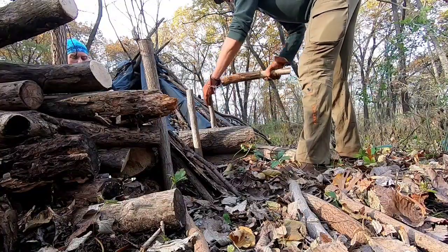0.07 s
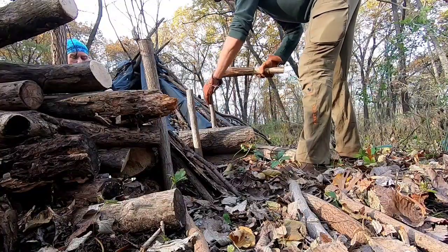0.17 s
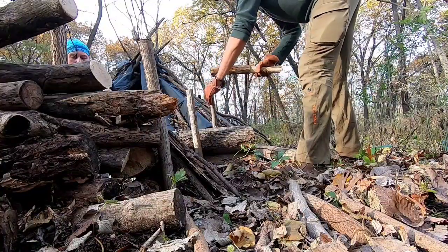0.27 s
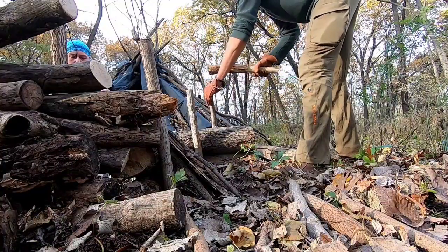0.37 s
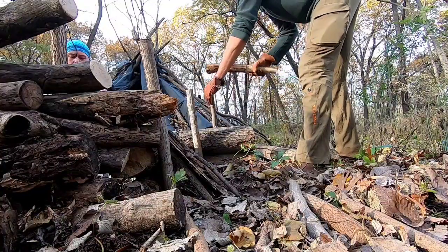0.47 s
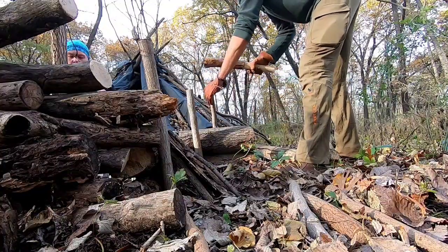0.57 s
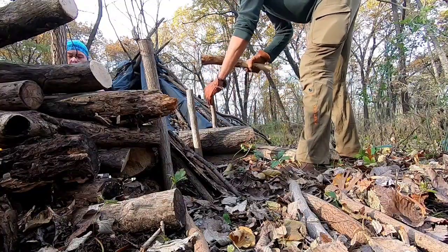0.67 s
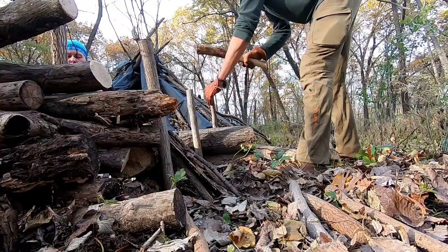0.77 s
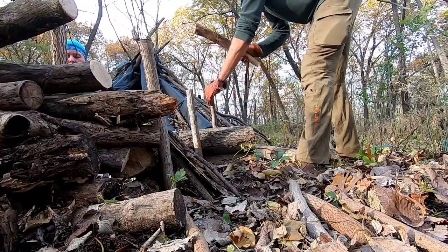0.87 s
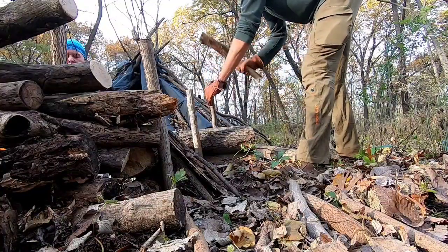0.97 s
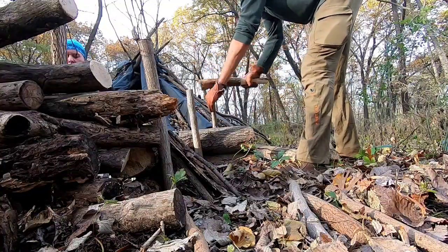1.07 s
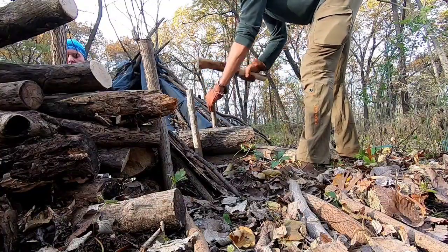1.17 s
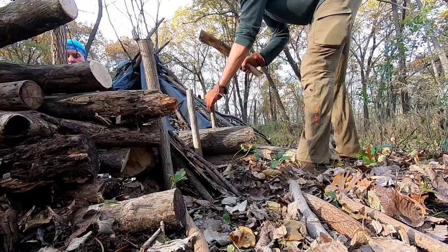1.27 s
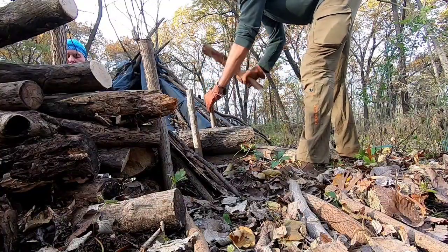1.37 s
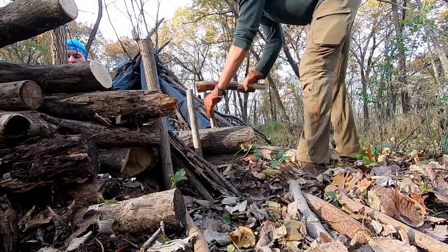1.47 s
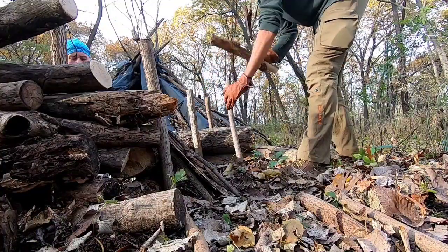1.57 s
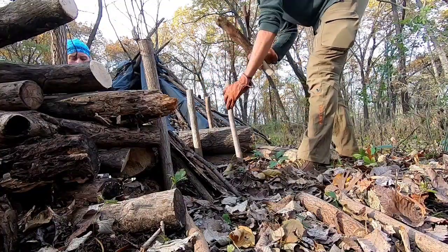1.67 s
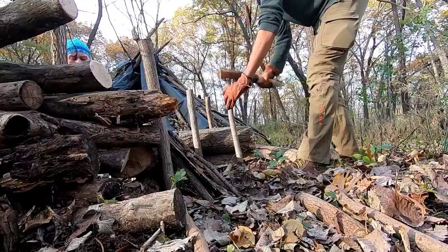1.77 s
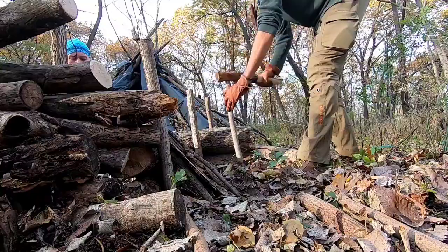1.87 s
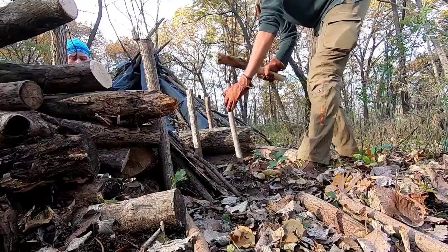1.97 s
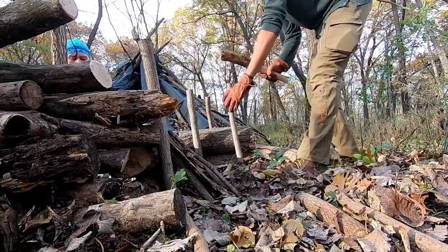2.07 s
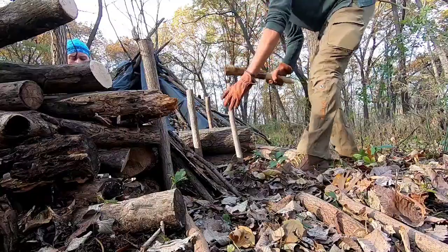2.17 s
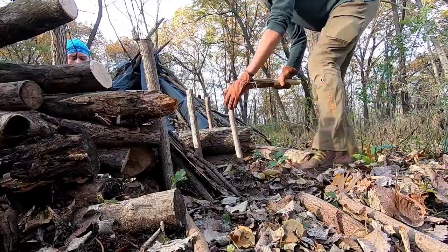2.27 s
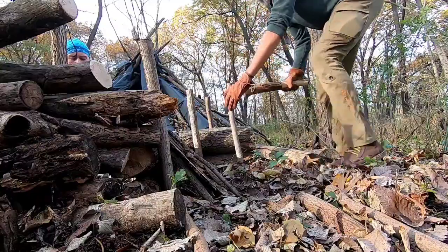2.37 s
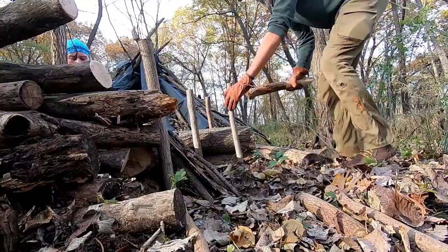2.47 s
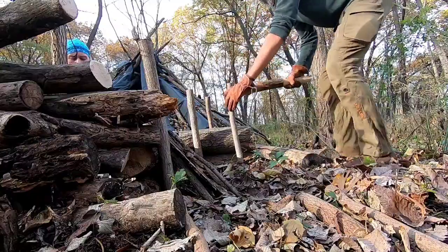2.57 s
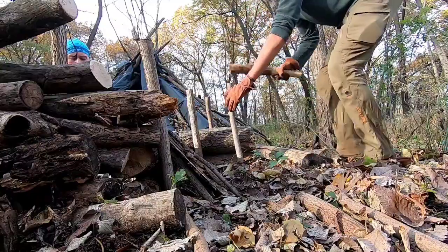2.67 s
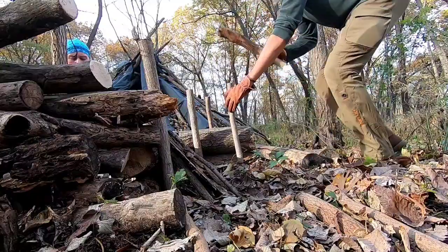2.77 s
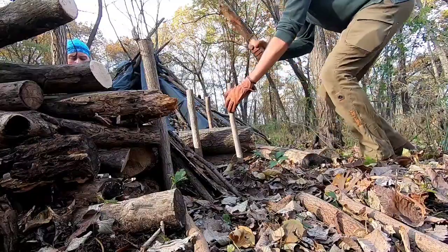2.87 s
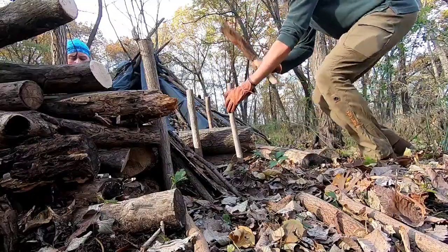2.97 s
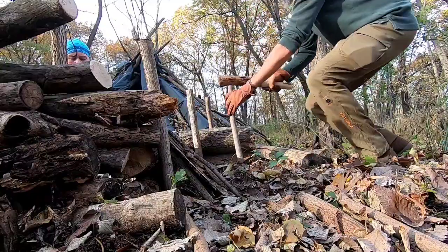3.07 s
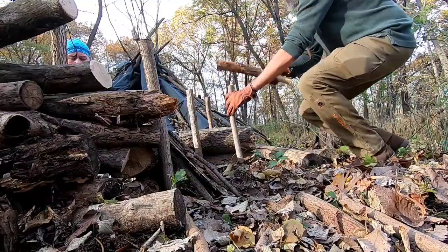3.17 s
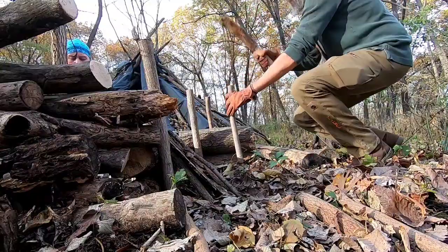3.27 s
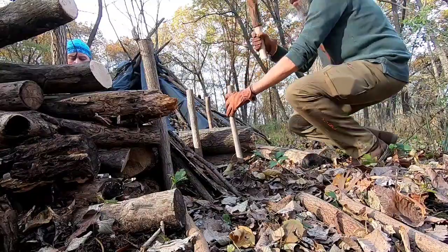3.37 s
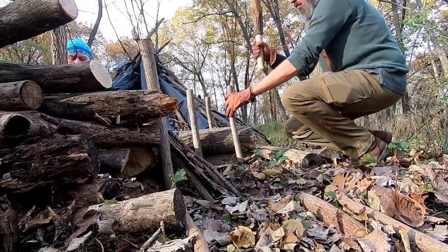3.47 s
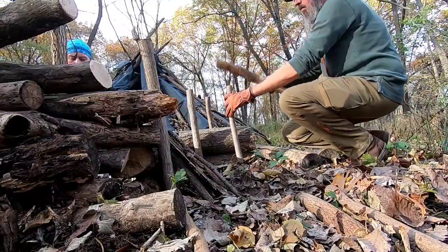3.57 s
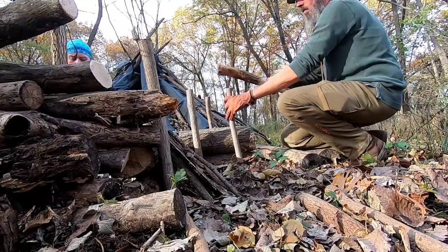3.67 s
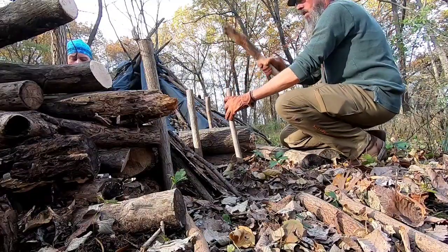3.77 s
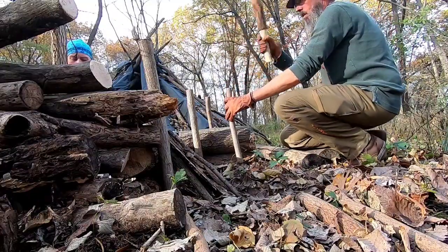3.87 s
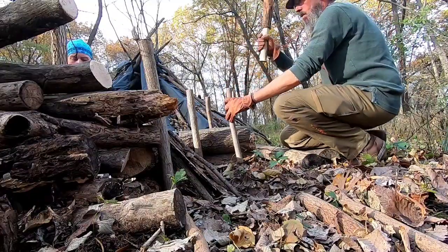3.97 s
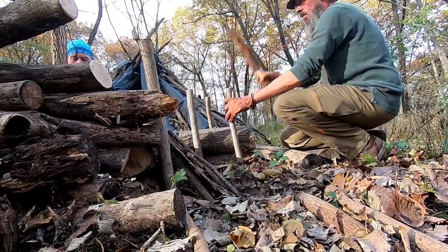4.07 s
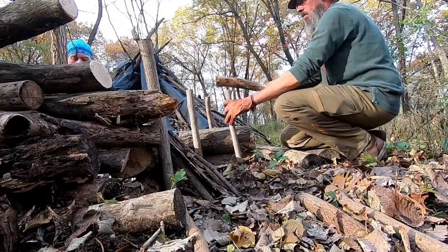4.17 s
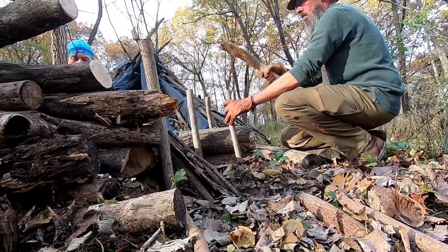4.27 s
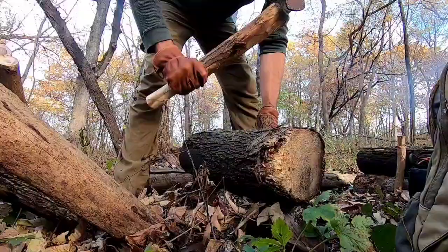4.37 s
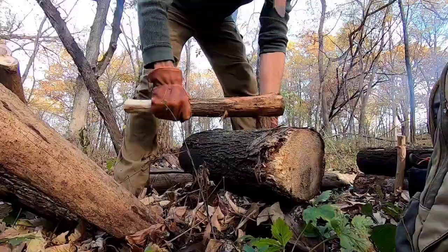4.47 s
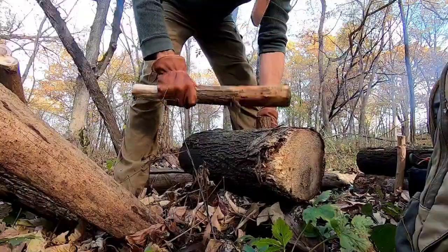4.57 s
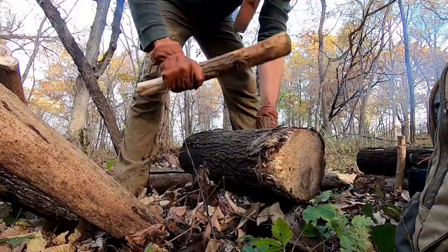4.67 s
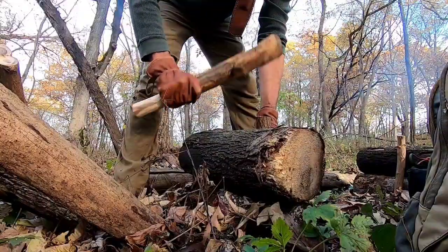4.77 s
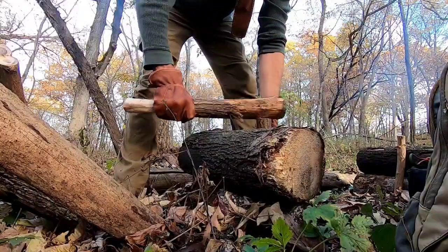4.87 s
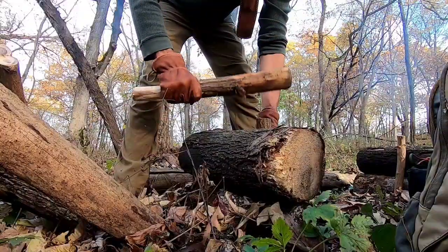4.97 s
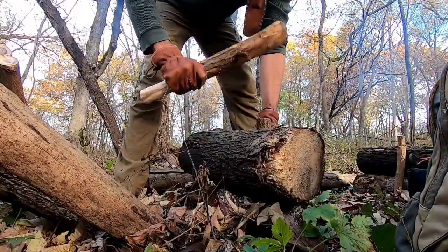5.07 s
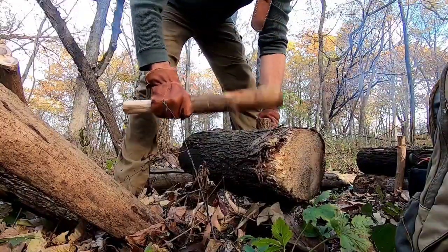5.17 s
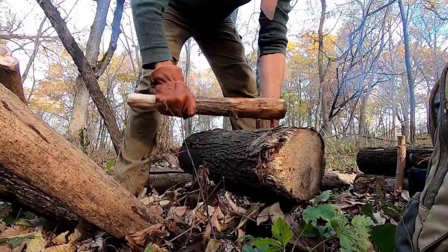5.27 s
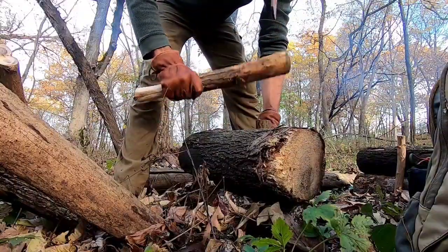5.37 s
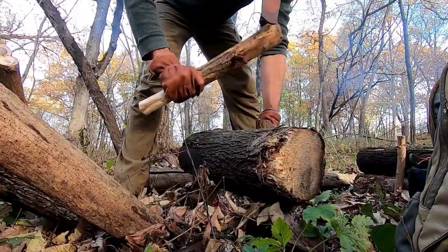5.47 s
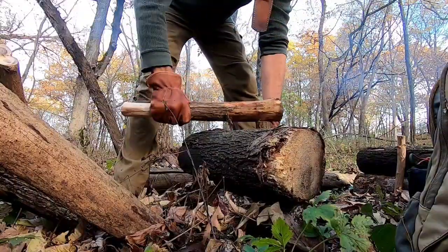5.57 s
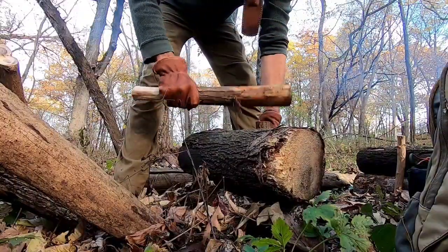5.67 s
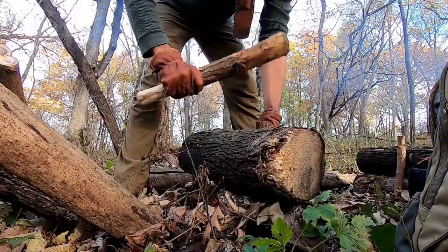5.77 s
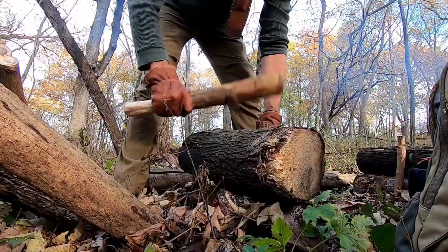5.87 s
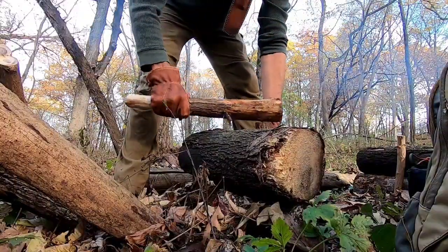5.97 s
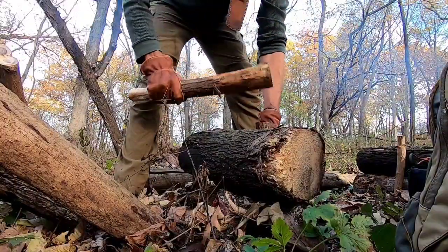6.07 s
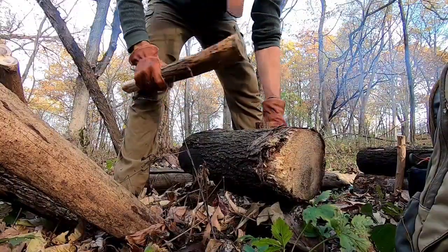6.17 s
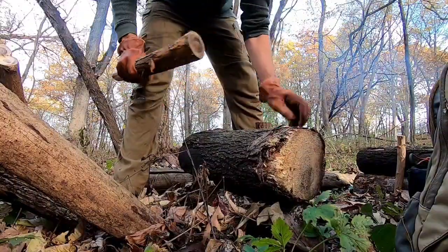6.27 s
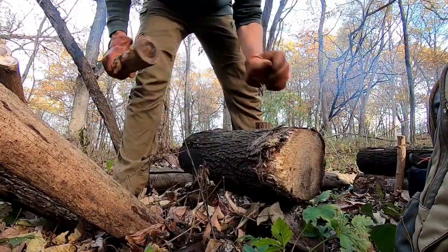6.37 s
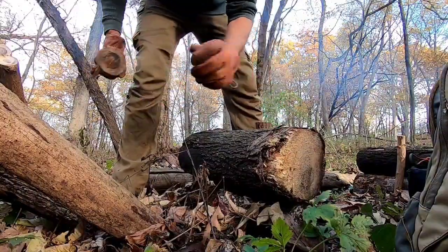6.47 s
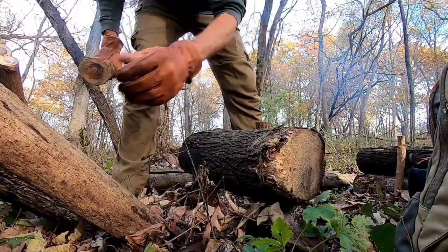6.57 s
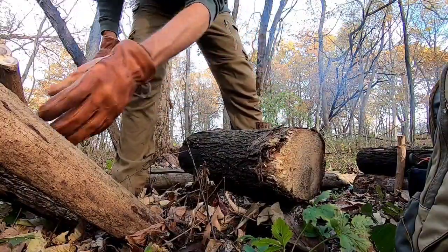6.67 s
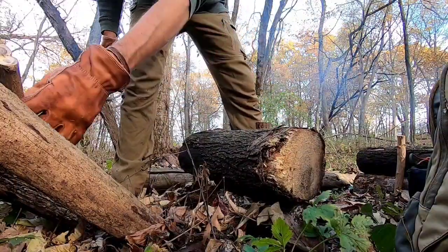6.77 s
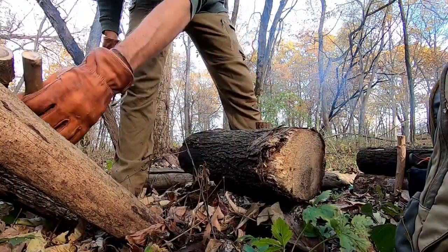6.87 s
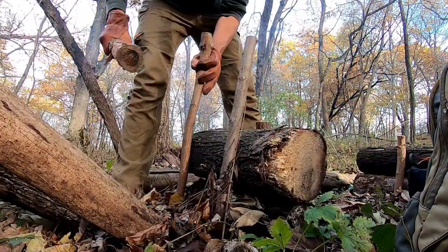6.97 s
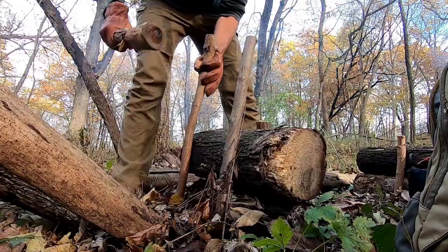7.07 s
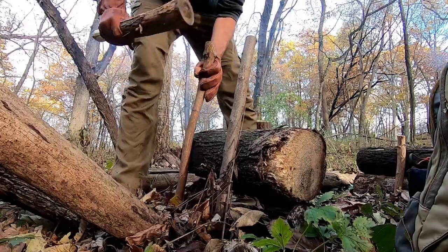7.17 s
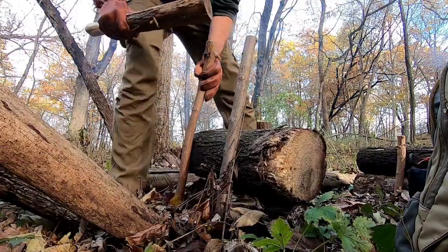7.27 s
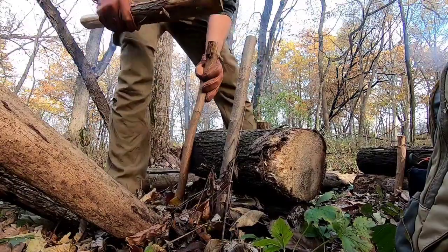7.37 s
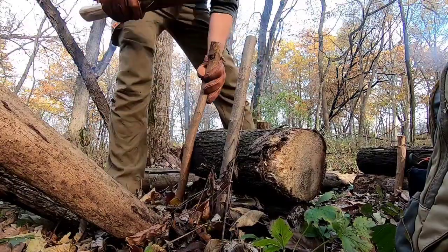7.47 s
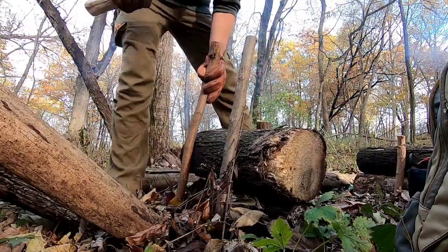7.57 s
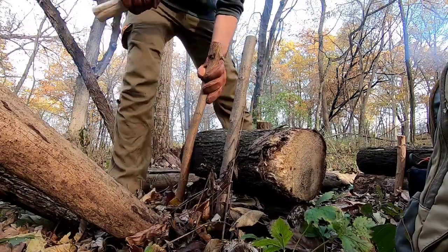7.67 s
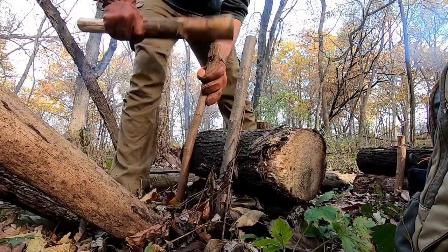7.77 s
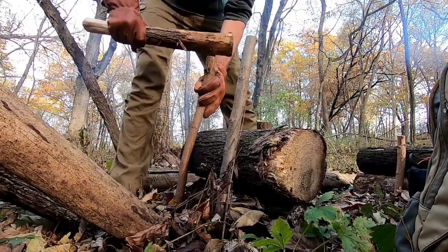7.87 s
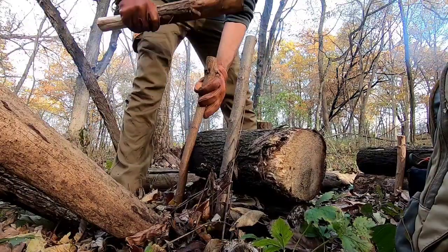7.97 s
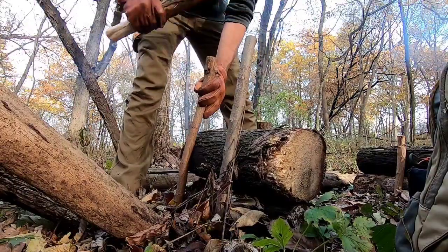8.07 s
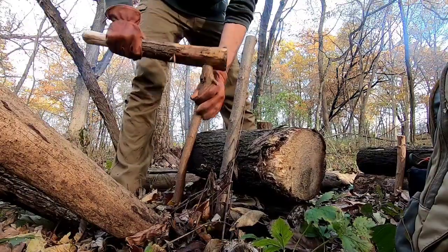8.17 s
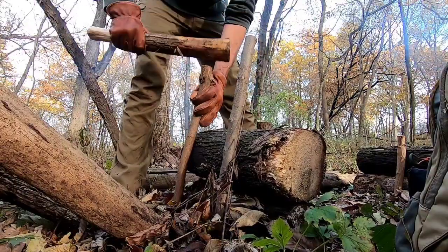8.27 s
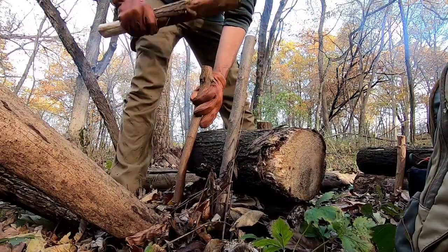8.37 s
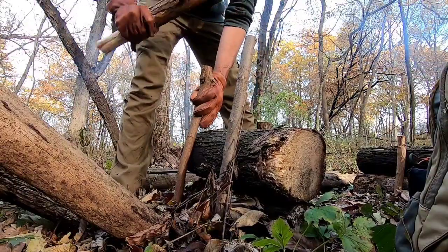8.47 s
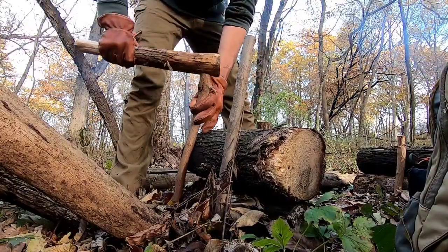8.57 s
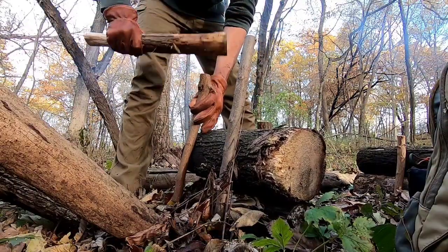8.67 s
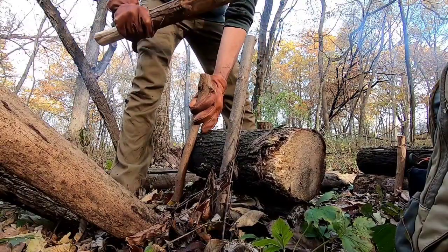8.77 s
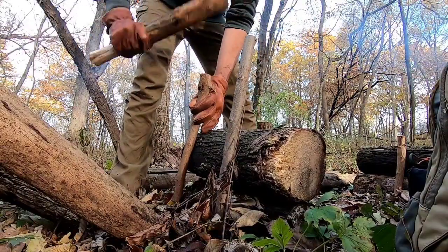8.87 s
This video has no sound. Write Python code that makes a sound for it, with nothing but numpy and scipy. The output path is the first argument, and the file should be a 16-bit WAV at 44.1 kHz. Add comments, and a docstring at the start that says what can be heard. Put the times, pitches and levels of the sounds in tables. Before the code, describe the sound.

Outdoors in woods, close to a small microphone, a wooden club hits stakes. Three spaced sharp knocks come first, then boots scuff crackling leaves and twigs snap before three more. The place changes and five steady, thuddier blows follow. After another change come leaf rustles, snaps and light wood taps, then three final knocks. Faint trunk echoes, hiss and low wind rumble surround them.

```python
"""Forest floor: a wooden club drives stakes into the soil a step from a small microphone, at three spots in turn.
Each blow excites damped modes of club and stake, a thud and ground shake in the soil, and a late echo from trunks.
Filtered noise makes the snaps, the crackle of boots in dry leaves, the wind rumble and the forest hiss.
Loud blows overload the microphone: its gain ducks after them and their peaks clip softly."""
import sys
import numpy as np
from scipy import signal
from scipy.fft import rfft, irfft, next_fast_len
from scipy.io import wavfile
from scipy.ndimage import uniform_filter1d

SR = 44100
rng = np.random.default_rng(int(sys.argv[2]) if len(sys.argv) > 2 else 0)


def wav_out(sig):
    """Save sig, one row per channel (or a flat mono array), as 16-bit PCM at SR to the path in sys.argv[1]."""
    wavfile.write(sys.argv[1], SR, np.round(np.clip(np.atleast_2d(sig).T, -1, 1) * 32767).astype(np.int16))


N = 393372

# Spots. Each row: start in seconds, hiss level in dB, club ring in Hz, lowest echo frequency in Hz,
# crack in dB relative to the knock, echo decay time (60 dB) in seconds.
SPOTS = [(0, -48.5, 1450, 624, -15, 0.27), (4.447, -45.5, 1307, 793, -10.5, 0.3),
         (7, -48, 2550, 900, -16.5, .36)]
# Stereo share at each spot, from 0 (mono) to 1.
STEREO = np.array([1., 0., 1.])
# Port trim: the left port is a little more open. Each row: gain in dB, left then right, before scaling.
PORT_DB = np.array([[.8], [-.8]])
# Club blows. Each row: start in seconds, each reflection from near logs in dB, shaken litter in dB, echo in dB,
# knock in dB, lower stake mode in Hz and dB, upper stake mode in Hz and dB, boost of the upper club modes in dB,
# thud in Hz and dB, body mode in Hz and dB, ground shake in dB, club ring in the echo in dB.
# Reflections, litter, echo, thud, body and shake are relative to the knock.
BLOWS = [(1.1613, -24.5, -19, -44.5, -4, 2450, -1, 3670, 0, 5.5, 228, -5, 465, -1.5, -23, -13),
         (1.5464, -24, -25.5, -45, -1, 1410, 14, 3650, 6, 14, 286, -8, 481, -10, -23, -5),
         (1.9103, -25, -43, -44.5, 1.5, 1760, 9, 2795, 4.5, -0.5, 237, -5.5, 427, -11, -14.5, -16),
         (3.1677, -31, -41, -43, 4.5, 1200, 2.5, 2825, 11.5, 6.5, 238, -4.5, 424, -13.5, -15, 6),
         (3.7232, -20.5, -26, -38.5, 0.5, 1410, 9, 1770, 2.5, -0.5, 217, 0.5, 287, -6.5, -7.5, 15),
         (4.2473, -18, -29, -38.5, -1.5, 1580, -4, 1980, -10, 4.5, 268, 1.5, 356, -4.5, -4, 13),
         (4.5918, -16, -24, -40.5, 2.5, 935, -1.5, 2300, 4.5, 0.5, 254, 1, 330, -21, -10.5, -20),
         (4.956, -17, -19, -40, 0, 960, -8, 1950, -18, -5, 293, -2.5, 305, 3.5, -9, 2),
         (5.3208, -21, -32, -41.5, 1, 1056, -4, 1710, -7.5, -1.5, 278, 0.5, 352, -6, -9.5, 9),
         (5.6848, -21.5, -25.5, -41.5, 2, 1743, -3.5, 2430, -1.5, 0, 278, 0.5, 290, -9, -10, 7),
         (6.0314, -23.5, -22, -41, 2.6, 1550, 0.5, 1935, -10.5, 0, 206, -7.5, 346, -9, -13.5, -9),
         (7.8948, -26, -21, -46.5, 1.5, 1650, -12, 2060, -14, 3.5, 219, -7, 325, -8.5, -22.5, -10),
         (8.2777, -21, -25.5, -44.5, 2, 1000, -8, 4254, -9, 5, 267, -4.5, 298, -10, -23, -7),
         (8.6633, -20.5, -22.5, -46, 2.5, 1662, 7.5, 3002, 1, 5.5, 294, -4.5, 339, -14, -20.5, 11)]
# Club modes at each spot. Each row: frequency in Hz, damping in Hz (0.95 over it is the 60 dB decay time
# in seconds), strength in dB.
CLUB_A = [(1080, 1500, 8.5), (1550, 710, 6), (2130, 300, -3.5), (2560, 840, -3), (3515, 410, -5),
          (4220, 440, -15.5), (6080, 580, -22.5)]
CLUB_B = [(737, 38, -8.5), (1000, 66, -10), (1293, 190, 1.5), (1950, 260, -5.5), (2305, 94, -5),
          (3060, 140, -7), (3964, 320, -11.5), (5625, 340, -15)]
CLUB_C = [(746, 93, -0.5), (1097, 720, 4), (1550, 290, -4.5), (2550, 640, -6.5), (3470, 280, -12),
          (4160, 430, -20.5), (4780, 580, -28)]
# Seconds at each spot that the wood rings at full strength while club and stake touch.
HOLD_S = [0.0028, 0.0052, 0.003]
# Soil modes. Each row: frequency in Hz before the pitch factor, strength in dB, 60 dB decay time in seconds.
SOIL_MODES = [(45, 3.5, 0.13), (60.8, -4, 0.24), (91, -10.5, 0.2)]
# Factor on the soil mode frequencies at each spot.
SOIL_PITCH = [1.01, 1, 2.5]
# Spectrum of shaken leaf litter and bark, and its fall at the top. Each row: frequency in Hz, relative dB per Hz.
LITTER = [(200, -20), (450, 3), (1200, -9.5), (3000, -11), (6000, -18)]
LITTER_TOP = [(8500, -45), (16000, -90)]
# Strength in dB of the 1.8 to 3.5 kHz part of the echo at each spot.
ECHO_TREBLE_DB = [-7, -12.5, -10.5]
# Delay in seconds of the echo at each spot.
ECHO_DELAY_S = [.018, 0.027, 0.042]
# Twig and leaf snaps. Each row: start in seconds, level in dB, pitch region in Hz.
SNAPS = [(0.4617, -39.5, 1990), (0.809, -38, 3700), (1.8794, -31, 6440), (2.266, -41, 3840),
         (2.5112, -28.5, 5100), (2.732, -24, 3200), (3.096, -34, 3220), (3.469, -39, 3820),
         (3.908, -46, 7000), (3.928, -45, 4760), (4.295, -38.5, 7950), (4.775, -30, 3720),
         (7.0137, -35.5, 2970), (7.1021, -19.5, 5050), (7.113, -26.5, 6400), (7.239, -30, 4130),
         (7.482, -35, 4060), (7.583, -34.5, 3130), (7.7462, -36.5, 2850)]
# Light taps of wood on wood. Each row: start in seconds, level in dB, frequency in Hz.
TAPS = [(0.369, -38.5, 298), (2.732, -29.5, 434), (7.274, -38, 550), (7.782, -34, 870), (8.168, -37.5, 880),
        (8.381, -34, 890), (8.4884, -23.5, 1080)]
# Dull brushing: arch length in seconds, level in dB at the top of the arch, lowest and highest frequency in Hz.
BRUSH = (0.5, -50, 213, 796)
# Boots scuffing dry leaves. Each row: start in seconds, hold in seconds, level in dB.
SCUFFS = [(0.368, 0.26, -56), (2.347, 0.11, -36.5), (2.534, 0.018, -30), (2.616, 0.041, -34.5),
          (2.7, 0.12, -39.5), (2.864, 0.067, -35), (3.1, 0.12, -44), (3.328, 0.11, -50), (7, 0.025, -47),
          (7.227, 0.024, -42.5), (7.436, 0.061, -45.5), (7.66, 0.011, -43.5), (7.83, 0.023, -42)]
# Spectrum of the leaves. Each row: frequency in Hz, relative dB per Hz.
LEAF = [(150, -58), (250, 1), (414, 2), (1100, -3), (2200, 0), (3600, 2.5), (5200, -3.5), (6940, -1),
        (8260, -9), (10200, -9), (13900, -24), (16000, -58)]
# Wind rumble on the microphone. Each row: time in seconds, level in dB.
RUMBLE = [(0.0, -33.5), (0.17, -50.5), (1.02, -42), (1.32, -49), (1.79, -43.5), (2.48, -50.5), (3.3, -43),
          (3.48, -48.5), (4.55, -48), (5.99, -45.5), (6.36, -48.5), (6.76, -35), (7.18, -44.5), (7.57, -46),
          (7.72, -40), (8.62, -46.5), (8.92, -48.5)]
# Spectrum of the wind. Each row: frequency in Hz, relative dB per Hz.
WIND = [(12, -41), (20, -33), (45, -2.5), (80, -2), (203, -19.5), (268, -26), (400, -35.5), (520, -44),
        (880, -120)]
# Spectrum of the forest hiss at each spot. Each row: frequency in Hz, relative dB per Hz.
HISS_A = [(71, -63), (120, -3), (204, 1), (569, -24), (789, -16.5), (1050, -20.5), (1320, -16.5),
          (2750, -16), (5300, -22.5), (7350, -23), (9990, -36), (11800, -46), (16000, -61)]
HISS_B = [(71, -44), (120, -30), (157, 2), (226, -4.5), (454, -21.5), (1030, -18.5), (1620, -17.5),
          (2380, -20), (3520, -19.5), (5190, -28), (6240, -42.5), (7980, -36), (11300, -53.5), (16000, -75)]
HISS_C = [(71, -38), (120, -10), (153, 10), (226, 2.5), (385, -10), (569, -12), (856, -12.5), (1340, -9.5),
          (3240, -10), (4780, -16.5), (7200, -18), (9790, -30.5), (16000, -61)]
# How far the two ports differ on distant sound. Each row: frequency in Hz, side minus mid in dB before the width.
WIDE = [(60, 7), (110, -28), (200, -12.5), (380, -3), (700, 0.5), (1290, 0), (2380, -5), (4400, -6),
        (8120, 2.5), (15000, 11)]

BLOW_T = np.arange(SR // 2) / SR  # time within a blow, s
SNAP_T = np.arange(SR // 10) / SR  # time within a snap, tap or brushing, s
KNOCK_S, BODY_S, SCATTER_S, LITTER_T60_S = .012, .028, .04, .085  # t60 of contact chatter, body, scatter, litter
STAKE_DAMPING_HZ = 350  # same meaning as the club damping
KNOCK_LEFT_DB, BODY_LEFT_DB = 2, 1.5  # left minus right at full stereo share
CLUB_DIRECT_DB, CLUB_T60_S = -18, .18  # the club sings on after the blow, relative to its ring in the echo
SNAP_CRACK_S, SNAP_T60_S, SNAP_TAIL_DB = 0.013, .045, -5  # t60 of crack and tail; level of the tail
TAP_CYCLES = 13.6  # cycles until a tap has died by 60 dB
BRUSH_S = .375  # start of the brushing
SCUFF_RISE_DB_S, SCUFF_FALL_DB_S = 174, 115  # dB per second
HUM_HZ, HUM_DB = 142.9, -47.5
GAIN_KNEE_DB, GAIN_SHARE, GAIN_RELEASE_S = -22, 0.095, 0.096
CLIP_TOP, TOP_HZ = .84, 16000  # amplitude ceiling of the clipping; top of the passband


def blows():
    """Superposition: every blow sums its direct wood, scatter, litter and soil sound with a delayed echo."""
    out = np.zeros((2, N))
    for row in BLOWS:
        s, near_db, litter_db, echo_db, knock_db = row[:5]
        stake, bright_db = ((row[5], row[6]), (row[7], row[8])), row[9]
        thud_hz, thud_db, body_hz, body_db, shake_db, club_db = row[10:]
        k = spot(s)
        width, crack_db = STEREO[k], SPOTS[k][4]
        knock = wood_knock(k, stake, bright_db)
        wood = knock + undb(near_db) * near_scatter(knock, width) + undb(litter_db) * shaken_litter(width)
        low = undb(thud_db) * soil_thud(thud_hz)
        low = low + undb(body_db) * tilt(BODY_LEFT_DB, width) * body_mode(body_hz, width)
        low = low + undb(shake_db) * ground_shake(k)
        direct = tilt(KNOCK_LEFT_DB, width) * wood + undb(crack_db) * contact_crack(width)
        add(out, s, undb(knock_db) * (direct + undb(PORT_DB * width) * low))
        add(out, s, undb(knock_db + echo_db) * (trunk_echo(k, knock, club_db) + club_singing(k, club_db)))
    return out


def wood_knock(k, stake, bright_db):
    """Modal superposition: contact pushes excite damped modes of club and stake, held until the wood parts."""
    # where the club lands decides how much its upper modes sound; neighbours alternate in sign
    club = []
    for j, (hz, damping, db) in enumerate((CLUB_A, CLUB_B, CLUB_C)[k]):
        club.append((hz, damping, (-1) ** (j + 1) * undb(db + bright_db * (hz > 1800))))
    wood = list(club)
    # the stake rings differently as it sinks; each mode takes the sign of the nearest club mode
    for hz, db in stake:
        nearest = min(club, key=lambda mode: abs(mode[0] - hz))
        wood.append((hz, STAKE_DAMPING_HZ, np.sign(nearest[2]) * undb(db)))
    free = np.maximum(BLOW_T - HOLD_S[k], 0)
    modes = sum(gain * np.sin(2 * np.pi * hz * BLOW_T) * undb(-60 * free * damping / 0.95)
                for hz, damping, gain in wood)
    modes = modes * (1 - np.exp(-BLOW_T / 0.00045))
    # rough bark makes the contact chatter: one push, then uneven smaller ones
    contact_t = BLOW_T[:SR // 40]
    contact = 0.025 * rng.standard_normal(len(contact_t)) * undb(-60 * contact_t / KNOCK_S)
    contact[0] = 1
    knock = signal.fftconvolve(modes, contact)[:len(BLOW_T)]
    return knock / np.abs(knock).max()


def contact_crack(width):
    """Impulsive contact: a burst of band-limited noise decaying within milliseconds."""
    noise = pair(*rng.standard_normal((2, len(BLOW_T))), 0.47 * width)
    return unit(band(noise, 1860, 5800)) * undb(-60 * BLOW_T / 0.014)


def near_scatter(knock, width):
    """Scattering: logs and ground close by return the knock for a few hundredths of a second, by convolution."""
    near = pair(*reflections(rng.standard_normal((2, len(BLOW_T))), 6000, 1), .8 * width)
    near = near * undb(-60 * BLOW_T / SCATTER_S)
    return signal.fftconvolve(near, knock[None], axes=1)[:, :len(BLOW_T)]


def shaken_litter(width):
    """Shot noise: the jolt rattles leaves and loose bark around the stake, heard as filtered decaying grains."""
    grains = reflections(rng.standard_normal((2, len(BLOW_T))), 9000, 2.3)
    rattle = pair(*colour(grains, LITTER + LITTER_TOP), 0.34 * width)
    return undb(-60 * BLOW_T / LITTER_T60_S) * (1 - np.exp(-BLOW_T / 0.001)) * rattle


def soil_thud(hz):
    """Damped resonance: two low modes sound as the stake gives way after the first contact."""
    pushed = np.maximum(BLOW_T - .001, 0)
    return -ring(pushed, hz, 0.033, 0.0009) - 0.45 * ring(pushed, 0.755 * hz, 0.058, 0.0035)


def body_mode(hz, width):
    """Damped resonance with interaural-style delay: a mode and its upper partner reach the right port later."""
    reached = np.maximum(BLOW_T - np.array([[.0008], [.0008 + 0.00007 * width]]), 0)
    return ring(reached, hz, BODY_S, 0.00019) + 0.32 * ring(reached, 1.536 * hz, 0.95 * BODY_S, 0.00024)


def ground_shake(k):
    """Slow wave propagation: the soil wave is slower than air, so its modes start late."""
    late = np.maximum(BLOW_T - .006, 0)
    return sum(undb(db) * ring(late, hz * SOIL_PITCH[k], t60, 0.02) for hz, db, t60 in SOIL_MODES)


def trunk_echo(k, knock, club_db):
    """Multiple reflection: scattered trunks each return the knock late; the echo swells unevenly and fades."""
    club_hz, echo_hz, _, echo_s = SPOTS[k][2:]
    far = np.maximum(BLOW_T - ECHO_DELAY_S[k], 0)
    trunks = reflections(rng.standard_normal((2, len(BLOW_T))), 3000, 2.2)
    trunks = unit(pair(*trunks, STEREO[k]) * far * undb(-60 * far / echo_s))
    returned = signal.fftconvolve(trunks, knock[None], axes=1)[:, :len(BLOW_T)]
    returned = unit(band(returned, echo_hz, 3300))
    treble = band(trunks, 1800, 3500)
    middle = band(band(trunks, echo_hz, 1414), echo_hz, 3500)
    club = band(trunks, club_hz - 20, club_hz + 20)
    club = club + undb(-10.5) * band(trunks, 1.62 * club_hz - 30, 1.62 * club_hz + 30)
    echo = undb(-12.5) * returned + undb(ECHO_TREBLE_DB[k]) * treble
    return echo + undb(6.5) * middle + undb(club_db) * club


def club_singing(k, club_db):
    """Free vibration: one lightly damped mode of the club sings on after the blow."""
    return undb(club_db + CLUB_DIRECT_DB) * ring(BLOW_T, SPOTS[k][2], CLUB_T60_S, .002)


def snaps():
    """Fracture: twigs and leaves break as broad noise clicks with a fast crack and a slower tail."""
    out, t = np.zeros((2, N)), SNAP_T
    for s, db, hz in SNAPS:
        click = band(rng.standard_normal(len(t)), hz / 2, min(hz * 1.75, 11000))
        click = unit(band(click, 810, 10000))
        decay = undb(-60 * t / SNAP_CRACK_S) + undb(SNAP_TAIL_DB - 60 * t / SNAP_T60_S)
        add(out, s, undb(db) * click * decay)
    return out


def taps():
    """Damped resonance: each dull tap of wood is one mode with band noise, dying in a fixed number of cycles."""
    out, t = np.zeros((2, N)), SNAP_T
    for s, db, hz in TAPS:
        t60 = TAP_CYCLES / hz
        noise = unit(band(rng.standard_normal(len(t)), hz / 2, hz * 2.0))
        noise = noise * undb(-60 * t / t60) * (1 - np.exp(-t * hz * 1.3))
        add(out, s, undb(db) * (ring(t, hz, t60, 0.21 / hz) + 1.98 * noise))
    return out


def brushing():
    """Friction: soft low band noise under the rising start of a sine arch."""
    out = np.zeros((2, N))
    length, db, lo_hz, hi_hz = BRUSH
    brush = unit(band(rng.standard_normal(len(SNAP_T)), lo_hz, hi_hz))
    # only the first 0.1 s of the arch sounds
    arch = np.sin(np.pi * np.minimum(SNAP_T / length, 1)) ** .5
    add(out, BRUSH_S, undb(db) * brush * arch)
    return out


def leaves():
    """Shot noise: dense crackles of uneven size, with dull and bright ones in patches of their own."""
    out = 0
    for lo_hz, hi_hz in ((150, 1300), (1300, 2600), (2600, 4600), (4600, 7000), (7000, 18000)):
        hit = rng.random((2, N)) < 5000 / SR
        grains = hit * rng.standard_normal((2, N)) * undb(2.2 * rng.exponential(size=(2, N)))
        crackle = unit(grains) + .8 * rng.standard_normal((2, N))
        patches = undb(1.6 * walk(110) + 1.8 * walk(30))
        out = out + band(crackle, lo_hz, hi_hz) * patches
    width = STEREO[spot(np.arange(N) / SR)]
    return scuffs() * pair(*colour(out, LEAF, WIDE), 0.18 * width)


def scuffs():
    """Energy summation: the gains of all scuffs add in power as each rises, holds and falls."""
    t = np.arange(N) / SR
    power = 0
    for s, hold, db in SCUFFS:
        rise = SCUFF_RISE_DB_S * np.maximum(s - t, 0)
        fall = SCUFF_FALL_DB_S * np.maximum(t - s - hold, 0)
        power = power + undb(db - rise - fall) ** 2
    return np.sqrt(power)


def wind_rumble():
    """Flow noise: low-frequency noise on the microphone, with slow swells and faster random fluctuation."""
    width = 0.66 * STEREO[spot(np.arange(N) / SR)]
    wind = colour(rng.standard_normal((2, N)), WIND) * undb(3.9 * walk(14))
    return curve(RUMBLE) * pair(*wind, 0.16 * width)


def forest_hiss():
    """Diffuse field: partly independent noise at the two ports, with a spectrum of its own at each spot."""
    k = spot(np.arange(N) / SR)
    width = 0.66 * STEREO[k]
    out = 0
    for j, points in enumerate((HISS_A, HISS_B, HISS_C)):
        hiss = colour(rng.standard_normal((2, N)), points, WIDE) * undb(SPOTS[j][1] + 0.21 * walk(24.0))
        out = out + (k == j) * pair(*hiss, width)
    return out


def hum():
    """Narrow-band noise: a bandwidth of a few Hz makes a wavering hum, heard at the last spot only."""
    tone = unit(band(rng.standard_normal(N), HUM_HZ - 4, HUM_HZ + 4))
    return (spot(np.arange(N) / SR) == 2) * undb(HUM_DB) * tone


def undb(db):
    """Decibel law: amplitude gain of a dB value."""
    return 10 ** (np.asarray(db) / 20)


def unit(x):
    """Normalisation: scaled to rms 1."""
    return x / np.sqrt(np.mean(x ** 2))


def colour(x, points, side=((1, 0), (2, 0))):
    """Spectral shaping: filter mid and side by (Hz, dB) points, the side also by its own; mid gets rms 1."""
    n = next_fast_len(x.shape[-1])
    log_f = np.log(np.arange(n // 2 + 1) * SR / n + 1)
    db, side_db = (np.interp(log_f, np.log(np.array(p)[:, 0]), np.array(p)[:, 1]) for p in (points, side))
    y = irfft(rfft(x, n) * undb([db, db + side_db]), n)[:, :x.shape[-1]]
    return y / np.sqrt(np.mean(y[0] ** 2))


def band(x, lo_hz, hi_hz):
    """Band-pass filtering by a Butterworth response."""
    return signal.sosfilt(signal.butter(2, [lo_hz, hi_hz], "band", fs=SR, output="sos"), x)


def walk(rate):
    """Random modulation: levels held for 1 / rate seconds, then smoothed by two moving averages."""
    k = int(SR / rate)
    held = np.repeat(rng.standard_normal(N // k + 1), k)
    return uniform_filter1d(uniform_filter1d(held, k), k)[:N]


def curve(rows):
    """Envelope: gain over time interpolated from (s, dB) rows."""
    return undb(np.interp(np.arange(N) / SR, *np.transpose(rows)))


def ring(t, hz, t60, rise_s):
    """Damped oscillation: an exponentially decaying mode with a soft start."""
    return np.sin(2 * np.pi * hz * t) * undb(-60 * t / t60) * (1 - np.exp(-t / rise_s))


def reflections(noise, per_s, spread_db):
    """Random arrivals: sparse reflections of uneven strength."""
    hit = rng.random(noise.shape) < per_s / SR
    return noise * hit * undb(spread_db * rng.exponential(size=noise.shape))


def pair(mid, side, width):
    """Mid-side decoding: left and right are the sum and the difference."""
    return mid + width * side * np.array([[1], [-1]])


def tilt(db, width):
    """Level difference: gains of left and right that lie db * width apart."""
    return undb(np.array([[db], [-db]]) * width / 2)


def add(out, s, x):
    """Superposition: mix a sound in at time s."""
    i = int(s * SR)
    x = x[..., :N - i]
    out[:, i:i + x.shape[-1]] += x


def spot(s):
    """Piecewise timing: index of the spot at time s."""
    return np.searchsorted([row[0] for row in SPOTS], s, side="right") - 1


def scene():
    """Superposition of the blows and all quieter sources, the latter tilted by the port trim."""
    quiet = snaps() + taps() + brushing() + leaves() + wind_rumble() + forest_hiss() + hum()
    return blows() + quiet * undb(.8 * PORT_DB * STEREO[spot(np.arange(N) / SR)])


def record(dry):
    """Nonlinear transduction: gain ducks after loud sounds, the peaks clip softly and the top is cut."""
    keep = np.exp(-1 / (GAIN_RELEASE_S * SR))
    power = signal.lfilter([1 - keep], [1, -keep], np.mean(dry ** 2, axis=0))
    ducked = dry * (1 + power / undb(GAIN_KNEE_DB) ** 2) ** (-GAIN_SHARE / 2)
    clipped = ducked / (1 + np.abs(ducked / CLIP_TOP) ** 4) ** .25
    return signal.sosfilt(signal.ellip(8, .2, 70, TOP_HZ, fs=SR, output="sos"), clipped)


dry = scene()
out = record(dry)
wav_out(out)
```